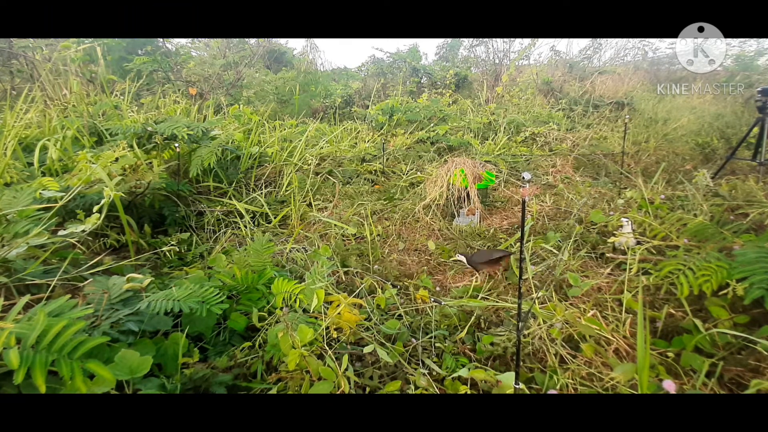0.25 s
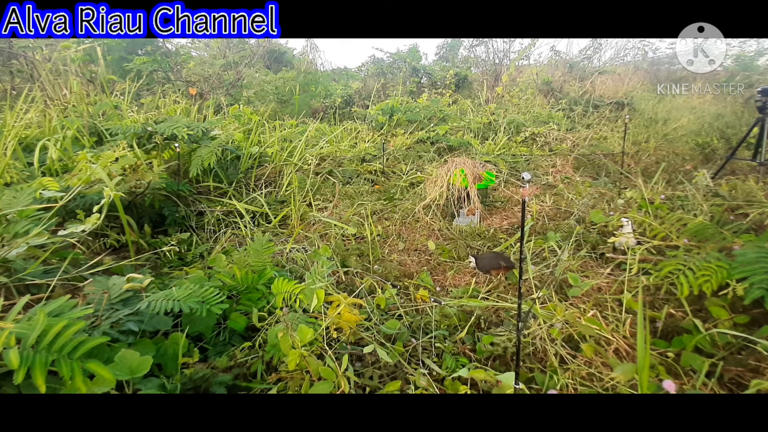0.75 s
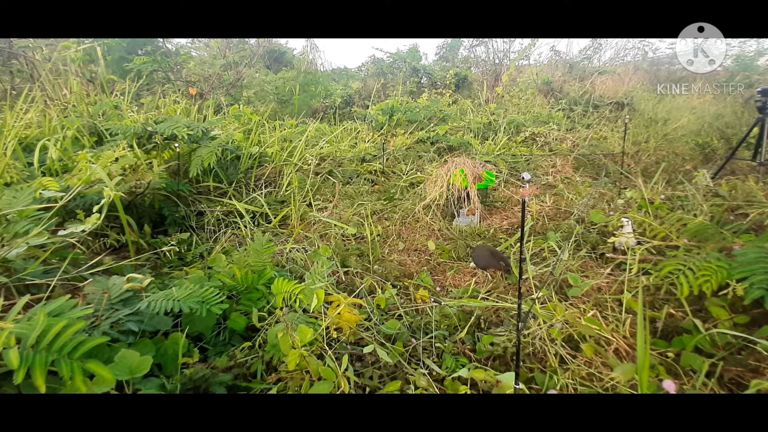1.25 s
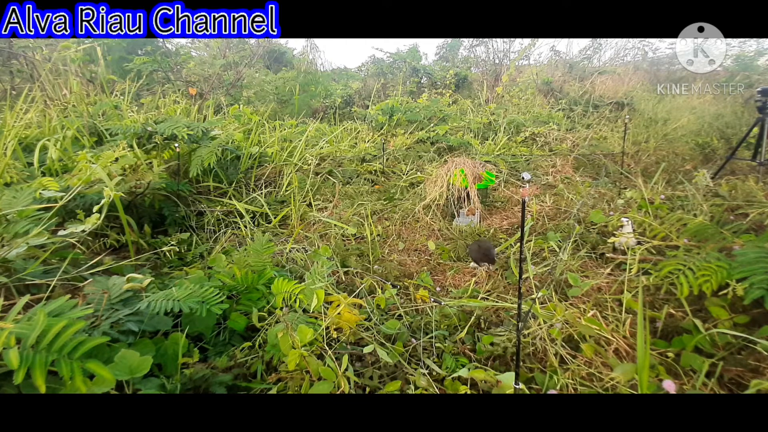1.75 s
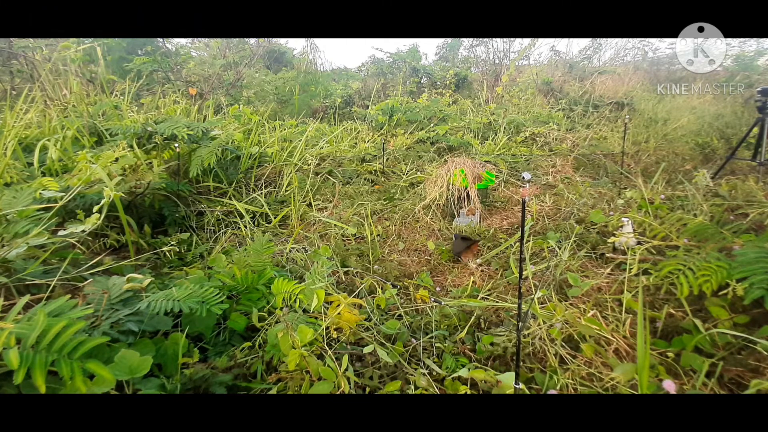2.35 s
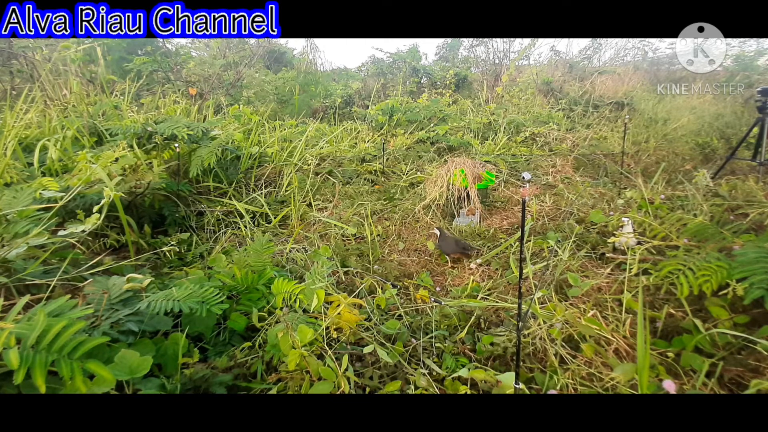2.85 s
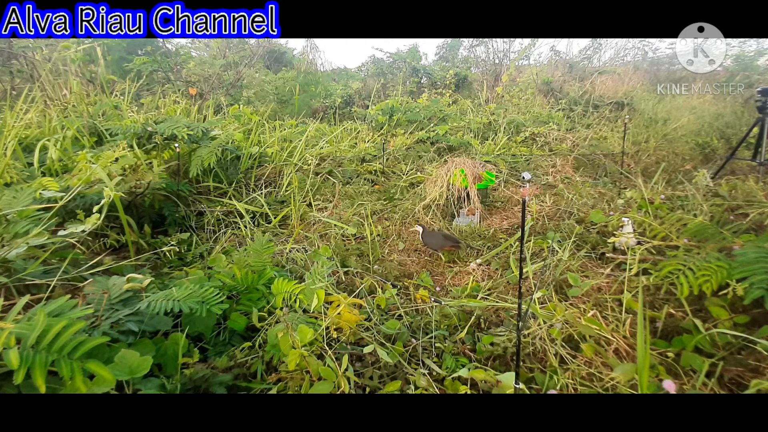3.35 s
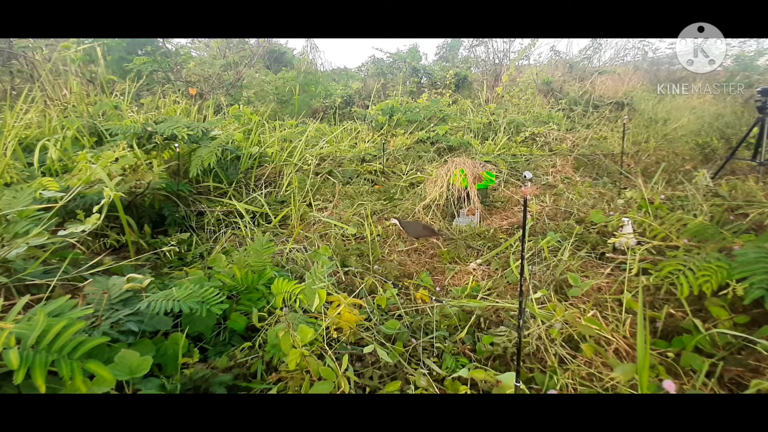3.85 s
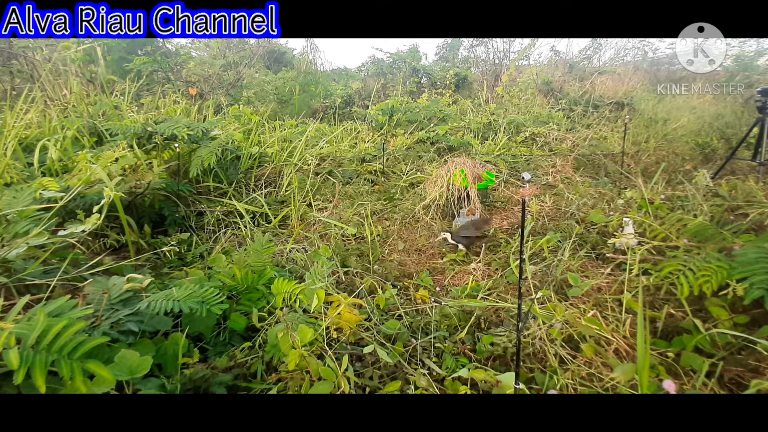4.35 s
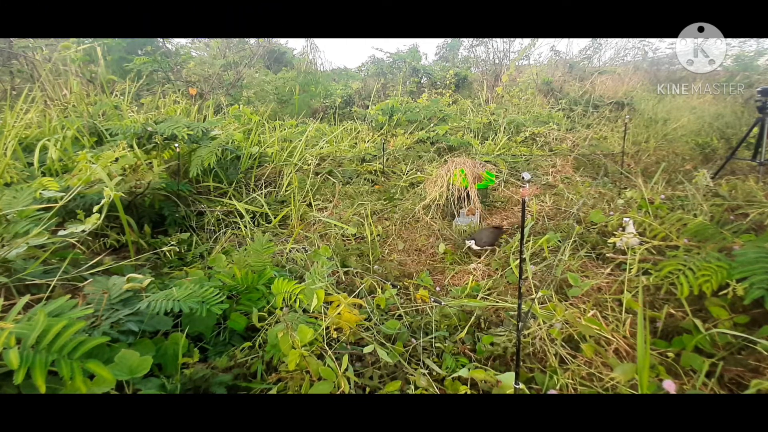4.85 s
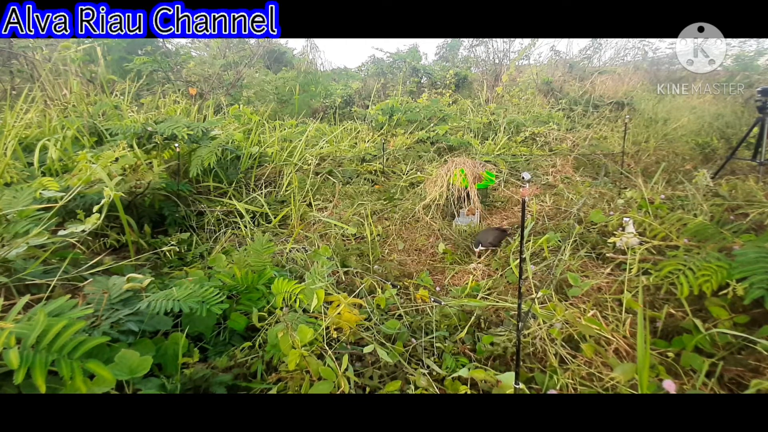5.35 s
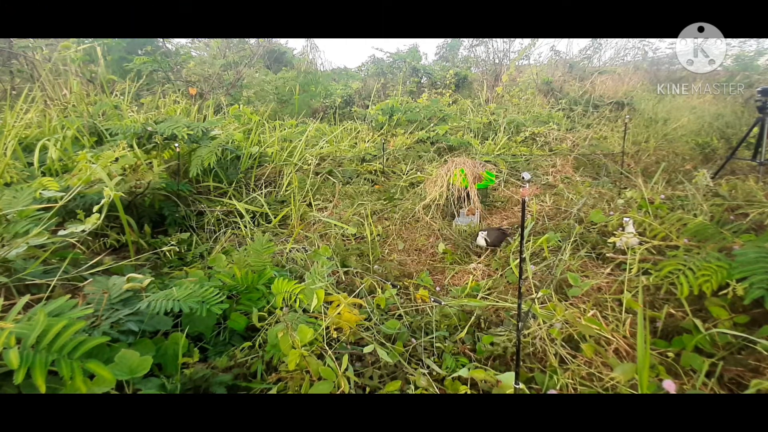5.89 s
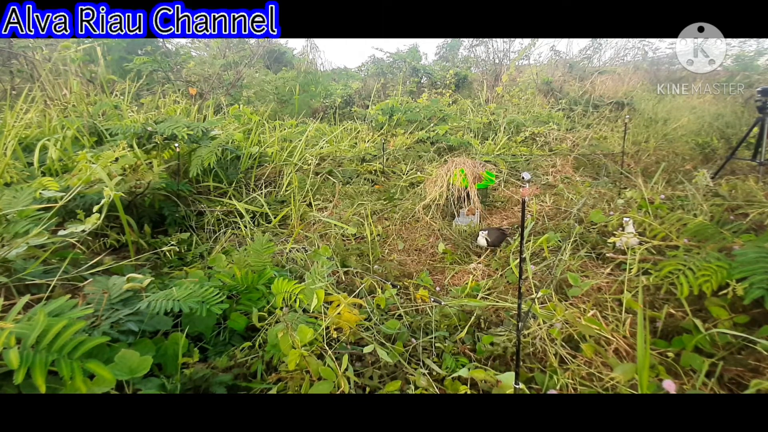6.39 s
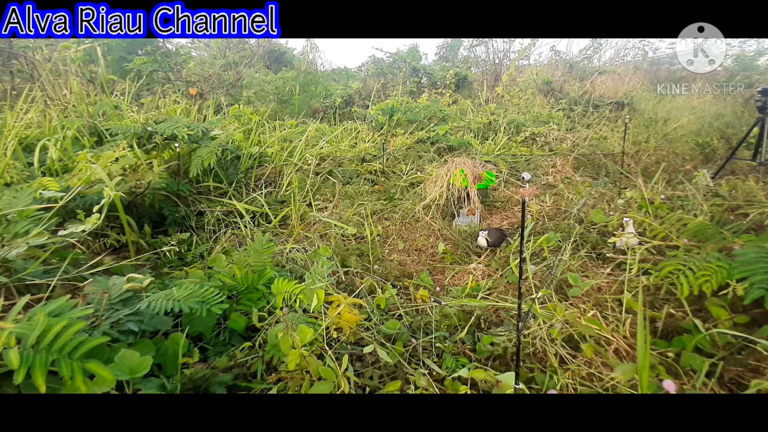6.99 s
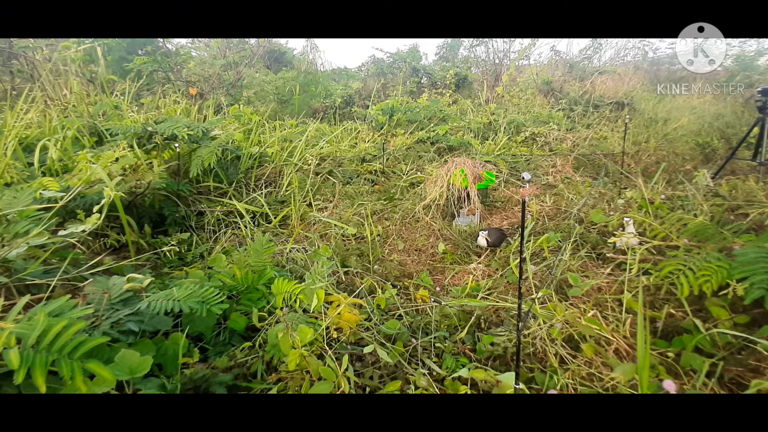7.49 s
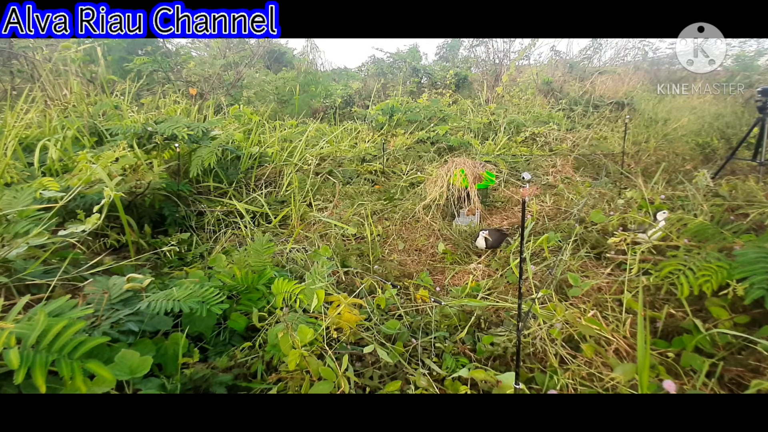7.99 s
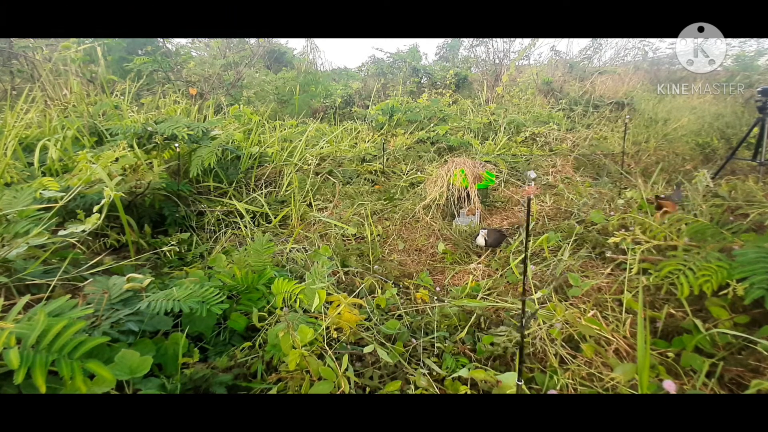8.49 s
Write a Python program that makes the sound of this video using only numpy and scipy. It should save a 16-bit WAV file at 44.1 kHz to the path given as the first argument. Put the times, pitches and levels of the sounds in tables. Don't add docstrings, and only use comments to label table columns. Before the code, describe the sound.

In open wet undergrowth, a waterhen a few metres from a phone microphone gives short, upward-breaking yelps about twice a second. A second bird clucks nearby, far birds whistle and a warbler trills. Small metal rings jingle midway, an insect buzzes past, then the second bird hisses and clucks before a denser jingle. Crickets, leaves and low distant engines continue.

```python
import sys
import numpy as np
from scipy import signal
from scipy.fft import rfft, irfft, next_fast_len
from scipy.io import wavfile
from scipy.ndimage import uniform_filter1d

SR = 44100
rng = np.random.default_rng(int(sys.argv[2]) if len(sys.argv) > 2 else 0)


def nominal_scale(level):
    x = np.asarray(level, float) / 20
    return 10 ** x


def log_audio(samples):
    frames = np.atleast_2d(samples).T
    limited = np.clip(frames, -1, 1)
    pcm = np.round(limited * 32767).astype(np.int16)
    wavfile.write(sys.argv[1], SR, pcm)


N = 384993
T = np.arange(N) / SR
PADDED = next_fast_len(N)


def noise():
    return rng.standard_normal(N)


def unit(x):
    return x / np.sqrt(np.mean(x ** 2))


def band(x, hz, width_hz):
    edges = [hz - width_hz / 2, hz + width_hz / 2]
    return unit(signal.sosfilt(signal.butter(2, edges, "bandpass", fs=SR, output="sos"), x))


def colour(x, points):
    hz, db = np.transpose(points)
    f = np.arange(PADDED // 2 + 1) * SR / PADDED + 1
    gain = nominal_scale(np.interp(np.log(f), np.log(hz), db))
    return irfft(rfft(x, PADDED) * gain, PADDED)[:N]


def walk(rate):
    hop = int(SR / rate / 16)
    coarse = rng.standard_normal(N // hop + 2)
    smooth = uniform_filter1d(uniform_filter1d(coarse, size=16), size=16)
    return unit(np.interp(np.arange(N) / hop, np.arange(len(coarse)), smooth))


def play(tables, edge_s=.003, glide_s=.008):
    s, *columns = np.concatenate([np.array(rows, float) for rows in tables]).T
    ends = np.ravel([(r[0][0] - edge_s, r[0][0], r[-1][0], r[-1][0] + edge_s) for r in tables])
    gate = np.interp(T, ends, [0, 1, 1, 0] * len(tables))
    return [uniform_filter1d(np.interp(T, s, c), int(glide_s * SR)) for c in columns] + [gate]


def tone(hz):
    return np.sqrt(2) * np.sin(2 * np.pi * np.cumsum(hz) / SR)


def waterhen():
    # (start [s], length [s], low note [Hz], top note [Hz], break strength [dB])
    calls = [(0.241, .097, 846.2, 1225, 0.5), (0.698, .102, 804.3, 1150, -20.5),
             (1.193, 0.099, 689.7, 1175, -0.5), (1.635, 0.1, 877.4, 1205, 2.5),
             (2.085, 0.1, 864.8, 1205, 5.5), (2.521, .11, 860.7, 1205, 2.5), (2.97, 0.11, 834.3, 1190, 2.5),
             (3.413, 0.1, 865.3, 1210, 4), (3.854, 0.11, 787, 1208, 2.5), (4.302, 0.11, 865, 1200, 4),
             (4.748, .11, 892.4, 1205, 3), (5.194, 0.11, 895.4, 1200, 4), (5.649, .109, 832.4, 1198, 1),
             (6.102, 0.11, 874, 1195, 2.5), (6.554, 0.11, 898.4, 1206, 3.5), (7.008, .108, 865, 1190, 2.5),
             (7.465, .11, 831.7, 1200, 3.5), (7.963, .107, 763.6, 1180, 3), (8.406, 0.11, 864, 1198, 0.5)]
    # (multiple of the pitch, level at full effort [dB])
    overtones = [(2, -28), (3, -7), (4, -32.5), (5, -17), (6, -43), (7, -36), (9, -47)]
    # (frequency [Hz], level [dB])
    beak = [(1700, -11), (2700, -9), (3400, -0.5), (4300, -2.5), (5900, -8.5), (6800, -10), (7800, -8),
            (9000, -26.5), (12000, -29)]
    hz, db, half_db, gate = play([call_table(*row) for row in calls], edge_s=.004, glide_s=.006)
    gate = np.minimum(2.5 * gate, 1)
    throat_ring = .3 * signal.lfilter([.004], [1, -.996], gate)
    hz = np.where(throat_ring > gate, 1180, hz)
    gate = np.maximum(gate, throat_ring)
    half_rise = np.gradient(half_db) * SR / 2500
    cracking = np.clip(uniform_filter1d(half_rise, 600, origin=-250), 0, .5)
    hoarse = np.clip((960 - hz) / 260 + cracking * (hz < 960), .02, 1)
    hz = hz * (1 + .085 * hoarse * walk(160))
    effort_db = db + 33 - 14 * np.clip((1060 - hz) / 80, 0, 2)
    half_db = half_db - np.clip((hz - 1100) / 8, 0, 12)
    half_pitch = tone(1.5 * hz) + nominal_scale(-5.5) * tone(hz / 2)
    voice = tone(hz) + nominal_scale(half_db) * half_pitch
    ragged, blur = walk(81), walk(300)
    for multiple, over_db in overtones:
        ragged_db = .5 * multiple * np.roll(ragged, 9001 * multiple)
        blur_hz = 1.4 * multiple ** 2 * np.roll(blur, 9001 * multiple)
        voice = voice + nominal_scale(over_db + effort_db + ragged_db) * tone(multiple * hz + blur_hz)
    rasp = nominal_scale(-8) * hoarse * band(noise(), 1200, 750)
    puff_db = .3 * uniform_filter1d(effort_db, 500)
    air = nominal_scale(-5.5 + puff_db) * colour(unit(noise()), beak)
    rough_voice = voice * nominal_scale(3 * hoarse * walk(250))
    return gate * nominal_scale(db) * (rough_voice + rasp + air)


def call_table(s, length, low_hz, top_hz, break_db):
    # (share of the length, pitch [0 = low note, 1 = top], level [dB], half-pitch lines re pitch line [dB])
    call_shape = [
        (0, -0.24, -39.5, -34),
        (.08, 0, -38, -27),
        (0.279, .03, -35.5, -39.5),
        (.34, .34, -42, -0.5),
        (.44, .5, -37, -3),
        (.6, 1, -30, -21),
        (.77, .88, -33, -51.5),
        (.93, .55, -32, -41),
        (1, .53, -35.5, -47),
    ]
    usual_low_hz = 865
    share, rise, db, half_db = np.transpose(call_shape)
    hz = usual_low_hz + rise * (top_hz - usual_low_hz) + (low_hz - usual_low_hz) * (rise < .2)
    cracked = break_db * (half_db > -15)
    return np.transpose([s + share * length, hz, db - 0.13 * cracked, half_db + cracked])


def clucks():
    # (start [s], length [s], level [dB], throat resonance [Hz], chest level [dB])
    cluck_events = [(0.345, 0.0097, -45, 1200, -43), (0.784, 0.012, -33, 1260, -35),
                    (0.846, .019, -37.5, 1170, -1), (1.186, .053, -43, 1180, -23.5),
                    (1.365, 0.022, -37.5, 1080, -1.5), (1.942, 0.02, -40.5, 1100, -1),
                    (4.662, 0.01, -43.5, 1185, -7), (6.578, 0.018, -35, 905, -7),
                    (7.821, 0.015, -28, 1360, -13.5), (8.17, 0.016, -29.5, 1380, -18),
                    (8.43, .026, -30, 1287, -19.5), (8.715, 0.046, -32.5, 1616, -29)]
    pulses = noise() * (rng.random(N) < 900 / SR) + 0.58 * noise()
    chest = band(pulses, 290, 170)
    bright = band(band(pulses, 2600, 1800), 2600, 1800)
    out = np.zeros(N)
    for s, length, db, hz, chest_db in cluck_events:
        part = slice(int((s - .02) * SR), int((s + .06) * SR))
        age = T[part] - s
        shape = np.clip(np.minimum(age / .001, (s + length - T[part]) / .005 + 1), 0, 1)
        throat = band(pulses[part], hz, .4 * hz)
        late = np.clip(age / length, .2, 1.2)
        bright_db = -31.5 + 40.5 * np.clip(hz / 1000 - 1.2, -.15, .2)
        out[part] += nominal_scale(db) * shape * (throat + nominal_scale(chest_db) * late * chest[part] + nominal_scale(bright_db) * bright[part])
    return out


def hiss():
    # (time [s], level [dB])
    hiss_levels = [
        (7.28, -90.5),
        (7.45, -72.5),
        (7.6, -77),
        (7.61, -61.5),
        (7.81, -56),
        (7.85, -60.5),
        (7.97, -68.5),
        (8.1, -78.5),
        (8.4, -74),
    ]
    # (frequency [Hz], level [dB per Hz])
    hiss_colour = [(410, -26), (700, -6), (1300, -1), (2000, -3), (2360, -2.5), (2600, -18), (2740, -7),
                   (4920, -23), (6000, -39), (7800, -75), (13200, -120)]
    db, gate = play([hiss_levels], edge_s=.03)
    return gate * nominal_scale(db + 8 + 2.59 * walk(90)) * unit(colour(noise(), hiss_colour))


def jingle():
    # (time [s], tick level [dB], low mode level after
    # it [dB], top mode level after it [dB])
    contacts = [(.0044, -38.5, -63, -67), (.165, -67, -61, -70), (0.2118, -57, -70.5, -64.5),
                (3.996, -45, -85, -82), (4.0738, -54.5, -80, -62), (4.0891, -49, -55, -58),
                (4.0991, -40, -36.5, -36.5), (4.1162, -29.5, -31.5, -39), (4.1476, -44.5, -46, -63),
                (4.1556, -50.5, -42.5, -48), (4.17, -52.5, -47, -62), (4.2064, -50, -57, -54),
                (4.2346, -47.5, -65, -54.5), (7.8229, -42, -71, -75), (8.5252, -42, -50, -59),
                (8.5449, -39, -39, -43), (8.5564, -44, -50, -51), (8.5655, -29.5, -33, -39.5),
                (8.575, -40.5, -30, -34), (8.6071, -41, -30.5, -27), (8.6136, -29.5, -41.5, -31.5),
                (8.6274, -49, -41.5, -48), (8.6315, -30.5, -59, -45.5), (8.638, -38, -37.5, -35),
                (8.6646, -34, -39.5, -48.5), (8.6694, -46, -42, -39), (8.677, -49, -36, -43),
                (8.6859, -38, -43, -53), (8.704, -38.5, -53, -54), (8.7074, -39, -42.5, -38)]
    # (frequency [Hz], decay by 60 dB [s])
    modes = [
        (4480, 0.088),
        (11710, .12),
        (12450, 0.096),
    ]
    s, tick_db, low_db, top_db = np.transpose(contacts)
    ring_db = [low_db, top_db - 11.5, top_db]
    last = np.maximum(np.searchsorted(s, T) - 1, 0)
    since = np.maximum(T - s[last], 0)
    click = np.exp(-since / 0.00039) + 0.13 * np.exp(-since / 0.0067)
    ticks = nominal_scale(tick_db[last] + 5.5) * click * (T > s[0])
    out = ticks * unit(colour(noise(), [(4000, -10), (6000, 0), (10000, -3), (15500, -8)]))
    for (hz, t60), db in zip(modes, ring_db):
        out = out + nominal_scale(db[last] + 3.5 - 60 * since / t60) * tone(hz * (1 + .0022 * walk(190)))
    out = out + nominal_scale(low_db[last] - 13 - 60 * since / .09) * tone(np.full(N, 5230.))
    return signal.sosfilt(signal.butter(6, 3900, "highpass", fs=SR, output="sos"), out)


def warbler():
    # (time [s], level [dB])
    phrases = [
        [(.923, -77), (1.316, -64.5), (1.63, -58), (2.05, -77.5)],
        [(3.13, -75.5), (3.435, -60), (3.665, -61), (3.87, -67.5), (4.075, -64), (4.225, -68)],
        [(5.40, -82), (5.59, -63.5), (6.08, -60), (6.29, -68), (6.565, -70.5), (6.875, -67.5)],
        [(8.007, -67.5), (8.227, -65), (8.4, -62), (8.537, -67), (8.672, -67)],
    ]
    chirps_sung = [
        [0, 9, 16, 25],
        [0, 7, 12, 15, 18, 20],
        [0, 3, 14, 18, 22, 26],
        [0, 5, 9, 12, 15],
    ]
    level, hz = np.zeros(N), np.full(N, 3420.)
    for rows, sung in zip(phrases, chirps_sung):
        s, db = np.transpose(rows)
        for centre in np.interp(np.arange(sung[-1] + 1), sung, s):
            part = slice(int((centre - .02) * SR), int((centre + .02) * SR))
            age = (T[part] - centre) / .012
            loud_db = np.interp(centre, s, db)
            level[part] = nominal_scale(loud_db) * np.clip(1.7 * (1 - age ** 2), 0, 1)
            hz[part] = 3420.5 - np.clip(295.0 + 22 * (loud_db + 60), 60, 400) * age
    return level * tone(hz) * nominal_scale(2.2 * walk(80))


def whistles():
    # (start [s], length [s], first pitch [Hz], last pitch [Hz], level [dB])
    whistle_notes = [(0.174, .115, 3320, 3740, -63.5), (.67, .035, 3420, 4080, -73),
                     (.71, 0.014, 3650, 3570, -62), (1.427, 0.049, 4200, 3800, -64),
                     (4.51, 0.12, 4730, 3860, -65), (4.918, 0.072, 3500, 3700, -74.5),
                     (5.415, .07, 4740, 4470, -68), (5.583, 0.051, 4000, 3740, -68.5),
                     (7.167, .055, 3800, 4280, -77), (7.879, 0.084, 3326, 3820, -72),
                     (7.955, .04, 3750, 3380, -82), (8.313, 0.085, 4866, 4530, -65.5),
                     (0.568, 0.028, 3600, 3900, -73.5), (0.075, .02, 2000, 1970, -69.5),
                     (6.329, 0.033, 2010, 2000, -72)]
    out, flutter_db, waver_hz = np.zeros(N), 3.0 * walk(70), 30 * walk(200)
    for s, length, first_hz, last_hz, db in whistle_notes:
        part = slice(int(s * SR), int((s + length) * SR))
        share = (T[part] - s) / length
        glide = np.exp(-share / 0.38)
        hz = last_hz + (first_hz - last_hz) * glide + waver_hz[part]
        edge = np.clip(np.minimum(share, 1 - share) * length / 0.0038, 0, 1)
        note_db = db + 0.5 * (2 * share - 1) ** 2 + flutter_db[part]
        out[part] += edge * nominal_scale(note_db) * tone(hz)
    return out


def buzz():
    # (time [s], pitch [Hz], level [dB])
    flight = [
        (4.89, 8530, -76),
        (5.0, 8750, -72),
        (5.07, 8950, -68.5),
        (5.27, 9070, -64),
        (5.49, 9030, -67),
    ]
    hz, db, gate = play([flight], edge_s=.008)
    stroke = (95.2 * (T - 5.1885)) % 1
    return gate * nominal_scale(db + 3) * np.sin(np.pi * stroke) ** 3 * tone(hz + 150 * (stroke - .5))


def crickets():
    throb = np.clip(.1 + np.cos(2 * np.pi * 14.53 * (T - .028)), 0, 1)
    chirp = (8.19 * (T - .066) + .5) % 1 - .5
    strokes = (np.abs(chirp) < .25) * np.clip(-np.cos(2 * np.pi * 8 * chirp), 0, 1)
    steady = nominal_scale(-69.5 + 1.5 * walk(1.5)) * throb * band(noise(), 7220, 50)
    scrape = nominal_scale(-78 + 2.5 * walk(1.2)) * strokes * band(noise(), 8820, 300)
    return place(steady, lag=3.0, left_db=-9) + place(scrape, lag=-1.1, left_db=7)


def marsh():
    # (frequency [Hz], level [dB per Hz])
    leaf_colour = [(300, 3), (600, -7), (1300, -12), (2100, -13), (2800, -16.5), (3400, -6), (3900, -12),
                   (4800, -6), (5800, -22.5), (7200, -6), (8300, -19.5), (9700, -23), (12000, -15.5),
                   (14000, -12.5), (15700, -8.5)]
    chorus = nominal_scale(-72 + 2.2 * walk(3) + 3 * walk(45)) * band(noise(), 4900, 700)
    return chorus + nominal_scale(-63 + 0.76 * walk(2.3)) * unit(colour(noise(), leaf_colour))


def engines():
    # (time [s], level [dB])
    hum_levels = [
        (0, -54.5),
        (1, -50.5),
        (2.7, -57.5),
        (4, -50),
        (5.5, -51),
        (6.7, -48.5),
        (7.4, -50),
        (8.2, -44.5),
        (8.73, -49),
    ]
    # (frequency [Hz], level [dB per Hz])
    traffic_colour = [(15, -55.5), (25, -23.5), (49, -4.5), (97, -1.5), (130, -4.5), (179, -11.5),
                      (267, -17.5), (413, -34), (600, -50.5), (780, -70.5), (1320, -120)]
    hum_db, _ = play([hum_levels])
    hum = nominal_scale(hum_db + 0.75 * walk(1.5)) * band(noise(), 57.8, 13.1)
    overtone = nominal_scale(-65.5 + 2.2 * walk(2.6)) * band(noise(), 190, 13)
    return hum + overtone + nominal_scale(-52 + 0.49 * walk(3.4)) * unit(colour(noise(), traffic_colour))


def place(x, lag, left_db):
    turn = np.exp(-2j * np.pi * np.arange(PADDED // 2 + 1) / PADDED * lag)
    left = irfft(rfft(x, PADDED) * turn, PADDED)[:N]
    return np.array([nominal_scale(left_db / 2) * left, nominal_scale(-left_db / 2) * x])


def scattered(x):
    age = np.arange(8000) / SR
    decay = nominal_scale(-60 * age / .17) + .06 * nominal_scale(-60 * age / .9)
    tail = rng.standard_normal((2, 8000)) * (age > .006) * decay
    return signal.fftconvolve(x[None], tail, axes=1)[:, :N]


def scene():
    hen, other, rings = waterhen(), clucks(), jingle()
    small = warbler() + whistles() + buzz()
    near = place(hen, lag=4.7, left_db=-3.3) + place(other, lag=12, left_db=-4)
    near = near + place(hiss(), lag=-21.6, left_db=-2.5) + place(rings, lag=6.55, left_db=-3.5)
    far = place(small, lag=-0.92, left_db=-5) + crickets()
    tails = scattered(nominal_scale(-49) * hen + nominal_scale(-50) * other + nominal_scale(-32.0) * small + nominal_scale(-35) * rings)
    around = place(engines(), lag=.8, left_db=-2.3) + np.array([nominal_scale(-3) * marsh(), marsh()])
    return near + far + tails + around


def low_pass(x):
    return signal.sosfilt(signal.butter(12, 15500, fs=SR, output="sos"), x)


def record(dry):
    band_pass = signal.ellip(8, .2, 60, [36, 15550], "bandpass", fs=SR, output="sos")
    return low_pass(signal.sosfilt(band_pass, dry))


dry = scene()
out = record(dry)
log_audio(out)
```